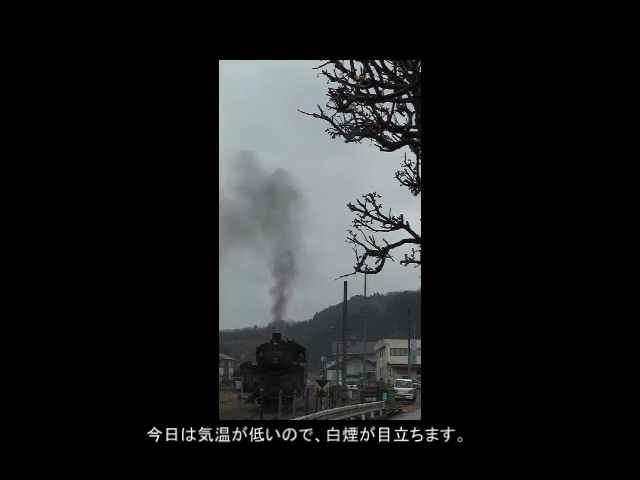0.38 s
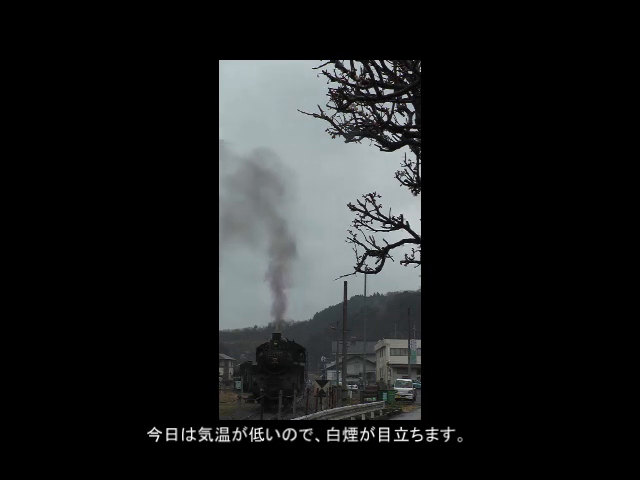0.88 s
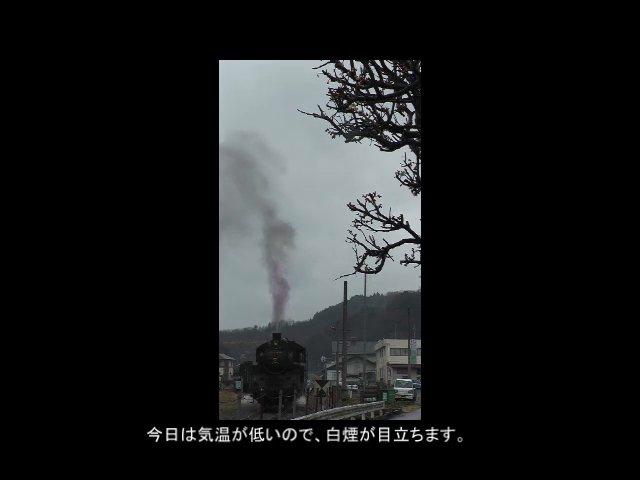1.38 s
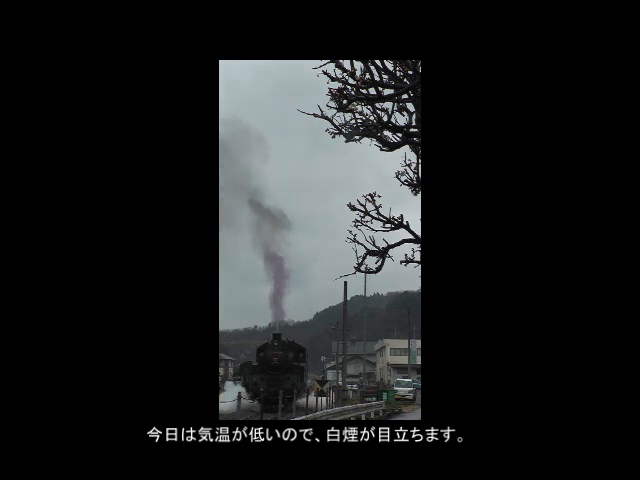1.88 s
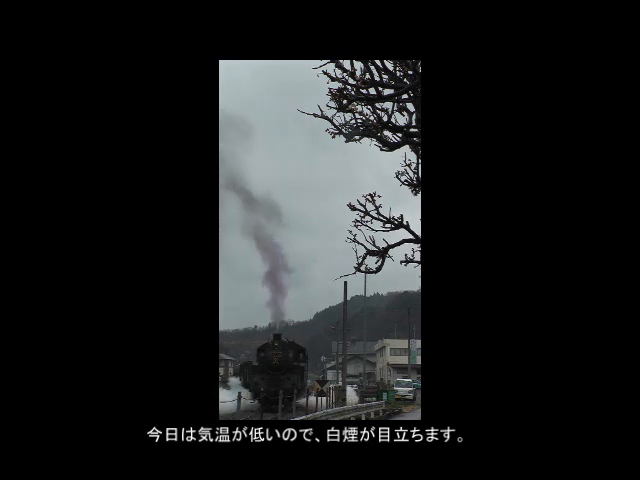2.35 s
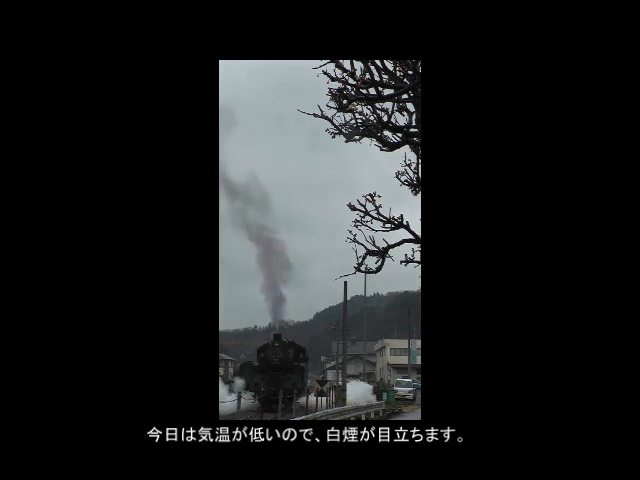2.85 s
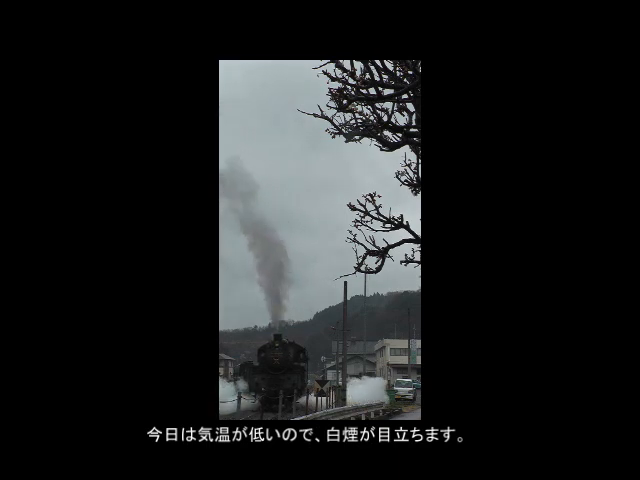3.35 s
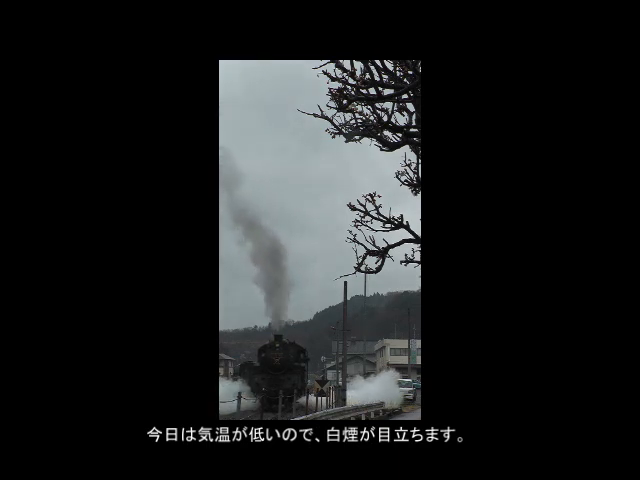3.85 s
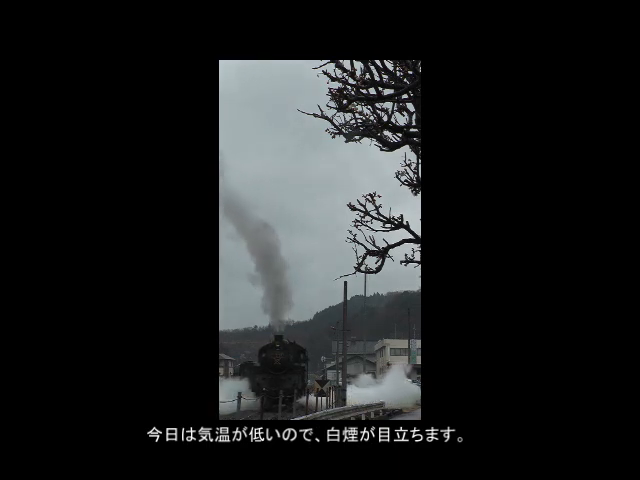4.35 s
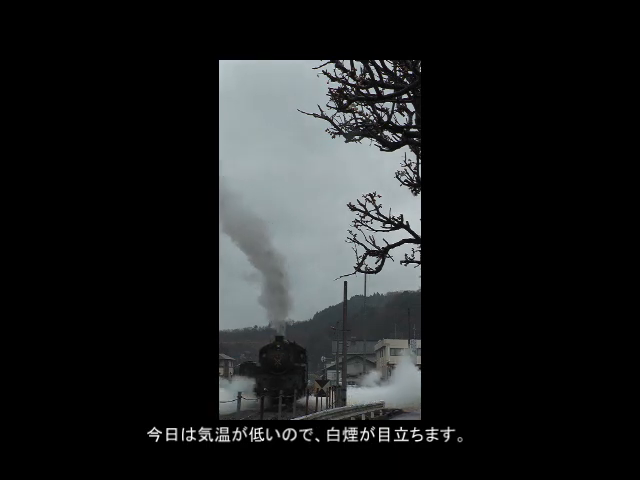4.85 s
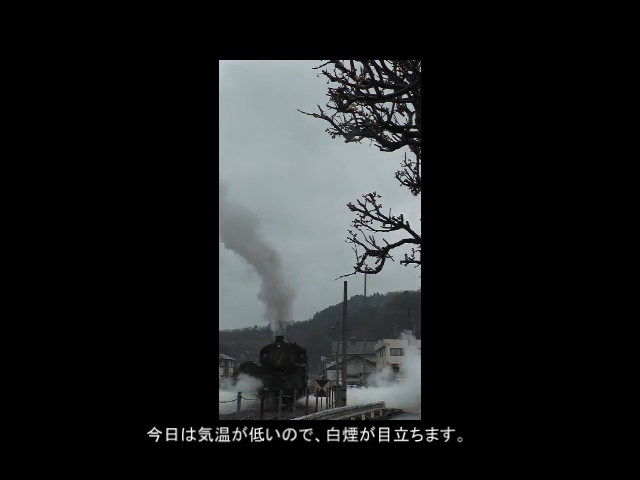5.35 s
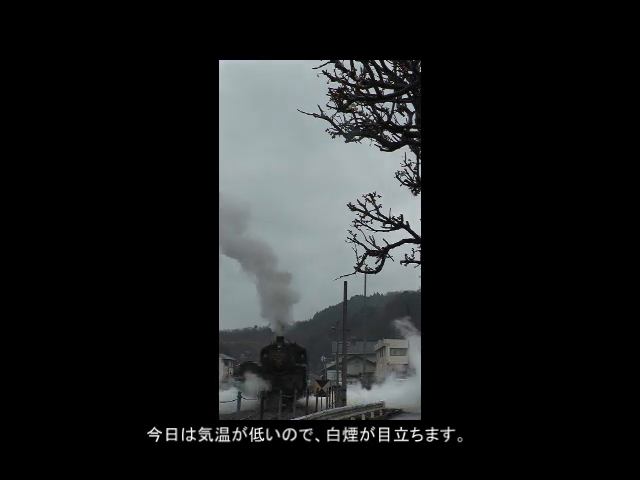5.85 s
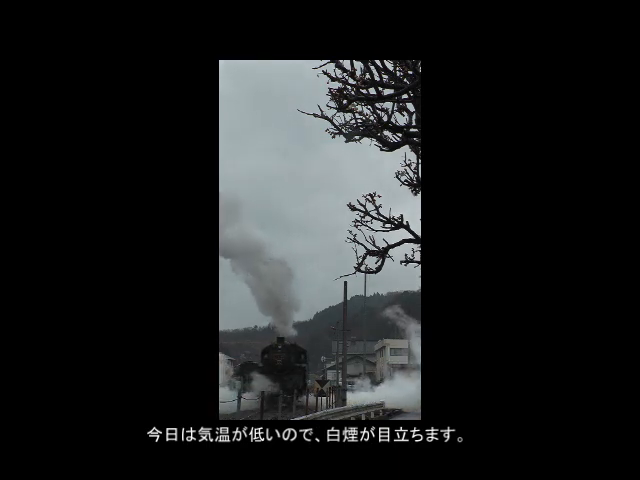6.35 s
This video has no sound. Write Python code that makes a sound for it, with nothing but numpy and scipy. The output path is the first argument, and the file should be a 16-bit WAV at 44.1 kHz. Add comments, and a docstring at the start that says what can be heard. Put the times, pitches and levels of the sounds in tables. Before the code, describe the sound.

A handheld stereo microphone under an umbrella catches crisp irregular drops, dense rain and faint traffic rumble. Then a locomotive's drain cocks open with a muffled low knock and a sudden jet of steam, which holds as a smooth, bright, slightly fluttering hiss, growing slightly and covering the rain. A distant motor rises in pitch, drops and rises again. Finally two bursts of low wind flutter push the hiss down.

```python
"""Drops tap on an umbrella close by over the wash of rain in a street, with low puffs of wind.
Then a steam engine some way off opens its drain cocks: a soft knock and a long bright hissing jet.
A road motor drones past, until a gust buffets the microphone ports and the hiss sinks under it.
Rain, steam and wind are shaped noise; drops and knock are dying rings; motor and gust are wavering swings."""
import sys
import numpy as np
from scipy import signal
from scipy.fft import rfft, irfft, next_fast_len
from scipy.io import wavfile

SR = 44100
rng = np.random.default_rng(int(sys.argv[2]) if len(sys.argv) > 2 else 0)


def to_linear_factor(level_db):
    """Convert decibel levels (scalar or array-like) to linear amplitude factors."""
    exponent = np.asarray(level_db, float) / 20
    return 10 ** exponent


def generate_wav(signal):
    """Clip the signal to [-1, 1] and save it as 16-bit WAV at the path in sys.argv[1]."""
    frames = np.transpose(np.atleast_2d(signal))
    scaled = np.clip(frames, -1, 1) * 32767
    pcm = np.round(scaled).astype(np.int16)
    wavfile.write(sys.argv[1], SR, pcm)


N = 285459
CUTOFF_HZ = 9950   # little is heard above this

# In spectra, level_db is per hertz and only the shape counts. Likeness: 1 = both sides the same, 0 = unrelated.
# big drops on the umbrella: start_s, strength_db, pitch_hz, left_over_right_db
UMBRELLA_DROPS = [(0.1313, -31, 2153, -17), (0.1424, -26, 2780, -7), (0.2144, -34.5, 1119, -7),
                  (0.2184, -29, 2174, -0.5), (0.244, -36.5, 1162, -14), (0.2477, -30.5, 3220, 0),
                  (0.2866, -35, 1500, -3), (0.3316, -32, 3014, 1), (0.3719, -36, 2980, -1),
                  (0.4219, -34.5, 3122, -6), (0.4393, -33, 1870, -6), (0.4579, -29, 1850, -5),
                  (0.4651, -30, 680, -8), (0.4706, -31.5, 784, 2), (0.4861, -24.5, 2150, -6.5),
                  (0.5284, -38, 624, -7), (0.5563, -40, 1540, 1), (0.6001, -36.5, 1593, 2),
                  (0.6084, -31.5, 1650, -12), (0.6411, -24.5, 1630, -6), (0.7427, -40, 1464, -4),
                  (0.7666, -30.5, 1470, -9), (0.7715, -34.5, 2120, -1), (0.8315, -38, 620, -7),
                  (0.8404, -34, 1500, -4), (0.8737, -33, 910, -7), (0.917, -37, 1571, -3),
                  (0.9494, -44, 586, -4), (0.9737, -36, 2000, -3), (0.9928, -37, 1270, -4),
                  (1.077, -32, 920, -4), (1.174, -38, 1184, -3), (1.222, -28.5, 3030, -3.5),
                  (1.2312, -40.5, 666, -6), (1.339, -26, 2180, -5), (1.3448, -19.5, 1610, -7.5),
                  (1.3545, -35.5, 1540, 1), (1.4317, -29, 2270, -3), (1.4941, -25.5, 980, -6),
                  (1.582, -36, 695, -3), (1.7018, -30, 1098, -6), (1.8233, -31.5, 1290, -9),
                  (1.8566, -33, 760, -10), (1.917, -31.5, 684, -4), (2.0095, -31.5, 1120, -6),
                  (2.5234, -43.5, 689, -13), (2.6766, -35, 1230, -12.5), (3.2313, -38.5, 1300, -15),
                  (4.0064, -37, 606, -10), (4.732, -38, 1122, -6), (4.8, -31, 1291, -16),
                  (5.402, -36.5, 1130, -7), (5.565, -40.5, 585, -14)]
# rain on the street and far traffic: time_s, wash_level_db, rumble_level_db
STREET_LEVELS = [(0.0, -54.5, -66.5), (0.75, -54, -58.5), (1.1, -56.5, -67), (1.35, -56, -59),
                 (1.6, -47.5, -54.5), (2.1, -51.5, -60), (2.4, -56, -64.5), (2.9, -76.5, -63),
                 (3.7, -53.5, -57.5), (4.3, -57.5, -60), (5.05, -49, -53.5), (5.4, -59, -57),
                 (6.1, -50.5, -52.5), (6.47, -44, -66)]
# colour of the rain wash: frequency_hz, level_db
WASH_SPECTRUM = [(240, -44), (400, -5), (544, -2.5), (769, -6), (1210, -3), (1910, -2.5), (2630, -5.5),
                 (3430, -7), (9720, -17), (12600, -44.5), (21400, -120)]
# colour of the traffic rumble: frequency_hz, level_db
RUMBLE_SPECTRUM = [(90, -17), (150, -1.5), (220, 2), (270, -3), (350, 3), (460, -9.5), (700, -14.5)]
# how alike the two sides of the street are: frequency_hz, likeness
STREET_LIKENESS = [(60, .1), (250, .6), (520, .7), (1070, .65), (2200, .8), (4500, .93), (9300, .9)]
# breeze on the ports between puffs: time_s, level_db
BREEZE_LEVELS = [(0.0, -56.5), (0.8, -61), (1.25, -63.5), (1.55, -59.5), (2.2, -65.5), (2.6, -73),
                 (3.1, -62), (3.4, -63.5), (3.8, -66), (4.4, -61.5), (5.2, -61.5), (6.1, -55.5), (6.2, -29),
                 (6.47, -32.5)]
# colour of the wind: frequency_hz, level_db
WIND_SPECTRUM = [(15, -37), (35, -3), (60, 5.5), (100, 1), (160, -16.5), (300, -28.5), (600, -42.5)]
# puffs of wind: peak_s, peak_level_db, left_over_right_db, dying_time_s
WIND_PUFFS = [(0.01, -44, -2, 0.036), (0.13, -48, -2, .04), (0.25, -50, 6, 0.021), (0.49, -58, 4, 0.046),
              (0.63, -49, 4, 0.079), (3.13, -50, -7, 0.024), (3.21, -52, -2, 0.044), (3.46, -47, -5, 0.033),
              (5.21, -52.5, 3, 0.094), (5.59, -44, 6, .12), (5.72, -46.5, 12, 0.13)]
# steam jet before it sinks: time_s, jet_level_db, roar_over_hiss_db
JET_LEVELS = [(1.44, -57, -18.5), (1.475, -49, -16), (1.49, -34.5, -29), (1.53, -29.5, -16),
              (1.75, -29.5, -14.5), (2.1, -28, -12.5), (2.22, -27, -22), (2.27, -29, -16),
              (2.78, -27.5, -19), (3.25, -27.5, -16.5), (4.2, -26.5, -15.5), (5.2, -26, -14.5),
              (5.9, -25.5, -13.5), (6.12, -27.5, -12), (6.47, -29, -10)]
# colour of the hiss: frequency_hz, level_db
HISS_SPECTRUM = [(1500, -30.5), (2600, -16.5), (3400, -11), (4200, -6.5), (5000, -3), (5900, -1.5),
                 (6800, -4.5), (7800, -8.5), (9300, -9), (9900, 13), (10500, -66.5)]
# colour of the spreading cloud's roar: frequency_hz, level_db
ROAR_SPECTRUM = [(300, -29.5), (700, -24), (1200, -15.5), (1800, -7.5), (2400, -3), (2650, -3.5),
                 (3200, -6), (4500, -12.5)]
# how alike the two sides of the jet are: frequency_hz, likeness
JET_LIKENESS = [(500, .68), (1100, .76), (2000, .9), (2900, .92), (4300, .985), (6300, .975), (9300, .94)]
# the jet again off the wet ground: frequency_hz, strength (share of the direct sound)
ECHO_STRENGTH = [(1000, .12), (2000, .3), (2800, .42), (3500, .33), (4200, .2), (6000, .1), (9000, .08)]
# low modes of the drain cocks: pitch_hz, level_db (before the soft start), time_to_fall_60_db_s
COCK_MODES = [(311, -33, 0.16), (150, -40, 0.16), (182, -45, 0.27)]
# a wavering hum: time_s, pitch_hz, level_db
HUM_PATH = [(3.35, 214, -72), (3.5, 217, -64), (3.7, 219, -66), (3.8, 221, -72), (3.95, 223, -65),
            (4.4, 225, -65), (4.7, 224, -67.5), (5.0, 224, -72)]
# road motor, its pitch climbing, dropping back and climbing again: time_s, pitch_hz, level_db
MOTOR_PATH = [(3.8, 60.4, -63), (4.19, 62.26, -59), (4.31, 61.6, -77), (4.48, 65.8, -55),
              (4.8, 72.17, -58.5), (5.41, 75, -57.5), (5.63, 64.1, -58), (5.8, 68.4, -65), (6.1, 71.6, -55)]
# two bouts of the gust: start_s, end_s
GUST_BOUTS = [(6.152, 6.3), (6.395, 6.5)]
# hardest eddies of the gust: middle_s, port (0 left, 1 right), strength_db, swing_hz
GUST_EDDIES = [(6.16, 0, -13, 115), (6.19, 0, -18, 135), (6.213, 0, -13, 112), (6.272, 0, -17, 110),
               (6.292, 0, -13, 88), (6.34, 0, -24, 80), (6.4, 0, -17, 140), (6.415, 0, -15, 170),
               (6.455, 0, -16, 140), (6.176, 1, -16, 120), (6.205, 1, -19, 105), (6.267, 1, -14, 100),
               (6.287, 1, -13, 95), (6.415, 1, -13, 175), (6.458, 1, -14, 165)]


def rms_one(x):
    """Scale to rms 1."""
    return x / np.sqrt(np.mean(x ** 2) + 1e-20)


def in_time(rows):
    """Columns of a table, joined by straight lines, at every sample."""
    s, *columns = np.transpose(rows)
    return [np.interp(np.arange(N) / SR, s, c) for c in columns]


def fade(rows, edge_s):
    """1 while the table lasts, fading in just before it and out just after."""
    t = np.arange(N) / SR
    return np.clip(np.minimum(t - rows[0][0], rows[-1][0] - t) / edge_s + 1, 0, 1)


def at_hz(points, hz):
    """A spectrum read on a log-frequency axis."""
    point_hz, value = np.transpose(points)
    return np.interp(np.log(hz), np.log(point_hz + 1), value)


def panned(x, pan_db):
    """Stereo: half the level difference goes to each side."""
    return x * to_linear_factor([pan_db / 2, -pan_db / 2]).reshape(2, -1)


def drift(rate):
    """Slow chance: noise at every 40th sample, smoothed twice by a low-pass at rate (Hz); spread 1."""
    r = np.exp(-80 * np.pi * rate / SR)
    noise = rng.standard_normal(N // 40 + 2002)
    slow = signal.lfilter([1], [1, -2 * r, r * r], noise)[2000:]   # the settling start is left out
    return np.interp(np.arange(N) / 40, np.arange(len(slow)), rms_one(slow - slow.mean()))


def coloured_noise(spectrum, likeness, shared_db, own_db, rate):
    """Stereo noise in overlapping octave-wide bands that flicker together and each alone; rms 1."""
    size = next_fast_len(N)
    hz = np.arange(size // 2 + 1) * SR / size + 1
    mid, side = rfft(rng.standard_normal((2, size))) * to_linear_factor(at_hz(spectrum, hz))
    alike = np.clip(at_hz(likeness, hz), -1, 1)
    pair = np.sqrt(1 + alike) * mid + np.sqrt(1 - alike) * side * [[1], [-1]]
    place = 2 * np.log2(hz)   # in half octaves
    together = drift(rate)
    first = int(2 * np.log2(spectrum[0][0]))
    last = int(2 * np.log2(min(spectrum[-1][0], CUTOFF_HZ))) + 1
    out = 0
    for k in range(first, last + 1):
        window = np.cos(np.pi / 2 * np.clip(place - k, -1, 1)) ** 2
        flicker = to_linear_factor(shared_db * together + own_db * drift(rate))
        out = out + irfft(pair * window, size)[:, :N] * flicker
    return rms_one(out)


def wind():
    """Lumpy low noise, nearly separate on each port: a swaying breeze, and puffs that rise fast and die."""
    rise_s = .025   # puffs rise the last 10 dB in this time, and fall 10 dB in their dying time
    t = np.arange(N) / SR
    breeze_db, = in_time(BREEZE_LEVELS)
    sway_db = 3.5 + 5 * drift(6)
    power = panned(to_linear_factor(breeze_db + 1.2 * drift(9)), sway_db) ** 2
    for s, peak_db, pan_db, dying_s in WIND_PUFFS:
        below_db = 10 * np.maximum((s - t) / rise_s, (t - s) / dying_s)
        power = power + panned(to_linear_factor(peak_db - below_db), pan_db) ** 2
    noise = coloured_noise(WIND_SPECTRUM, [(20, .1), (600, .1)], shared_db=1.1, own_db=1.1, rate=9)
    return np.sqrt(power) * noise


def street():
    """Rain too far and dense to hear as drops, over the rumble of traffic: two coloured noises."""
    wash_db, rumble_db = in_time(STREET_LEVELS)
    wash = coloured_noise(WASH_SPECTRUM, STREET_LIKENESS, shared_db=.4, own_db=.6, rate=12)
    rumble = coloured_noise(RUMBLE_SPECTRUM, STREET_LIKENESS, shared_db=0.3, own_db=1.1, rate=6.0)
    return to_linear_factor(wash_db) * panned(wash, pan_db=-3.0) + to_linear_factor(rumble_db) * panned(rumble, pan_db=0.5)


def ring(clicks, hz, t60):
    """A unit click sets a sine of about height 1 ringing, falling 60 dB in t60 seconds."""
    r, w = to_linear_factor(-60 / (t60 * SR)), 2 * np.pi * hz / SR
    return signal.lfilter([0, np.sin(w)], [1, -2 * r * np.cos(w), r * r], clicks + 1e-18)


def patter():
    """Small drops land at random in loose clumps, each ringing a few cycles at one of 14 pitches."""
    drops_per_s, level_db, pan_db = 160, -53.5, 2   # rate before clumping, level of the smallest drops
    sizes = to_linear_factor(4.7 * np.minimum(rng.exponential(1, N), 3.5)) * rng.choice([-1, 1], N)
    born = rng.random(N) < drops_per_s * to_linear_factor(3.1 * drift(8)) / SR
    pitches, dealt = np.geomspace(450, 6000, 14), rng.integers(0, 14, N)
    taps = sum(ring(sizes * born * (dealt == k), hz, 4.7 / hz) for k, hz in enumerate(pitches))
    return panned(to_linear_factor(level_db) * taps, pan_db)


def drops():
    """A drop is a tick, a few cycles of the taut cloth and a short splatter, a little different in each ear."""
    cloth_cycles = 6.0   # the cloth falls 60 dB in this many cycles
    overtone, overtone_db = 2.3, -5   # pitch ratio and level over the main ring
    out, t = np.zeros((2, N + 2000)), np.arange(1500) / SR
    dull = signal.butter(2, 4500, fs=SR, output="sos")
    chance = signal.sosfilt(dull, rng.standard_normal((len(UMBRELLA_DROPS), 3, 1500)))
    for (s, strength_db, hz, pan_db), noise in zip(UMBRELLA_DROPS, chance):
        swing = np.sin(2 * np.pi * hz * t)
        swing = swing + to_linear_factor(overtone_db) * np.sin(2 * np.pi * overtone * hz * t)
        onset = np.minimum(2 * t * hz, 1)   # half a cycle
        cloth = swing * onset * to_linear_factor(-60 * (t * hz - .5) / cloth_cycles)
        tick = 0.5 * noise[0] * to_linear_factor(-60 * t / 0.003)
        splatter = 0.28 * (noise[0] + .5 * noise[1:]) * to_linear_factor(-60 * t / 0.041)
        at = round(s * SR)
        out[:, at:at + 1500] += panned(to_linear_factor(strength_db) * (cloth + tick + splatter), pan_db)
    no_bass = signal.butter(2, 220, "high", fs=SR, output="sos")   # the cloth is too small for bass
    return signal.sosfilt(no_bass, out[:, :N])


def ground_echo(x):
    """Direct sound plus a duller copy just behind it, wavering as the cloud drifts: a comb of peaks and notches."""
    lag_s, phase_turns = .00263, .33
    size = next_fast_len(N + 2000)
    hz = np.arange(size // 2 + 1) * SR / size + 1
    echo = at_hz(ECHO_STRENGTH, hz) * np.exp(-2j * np.pi * (hz * lag_s - phase_turns))
    return x + irfft(rfft(x, size) * echo, size)[:, :N] * to_linear_factor(1.2 * drift(1.5))


def scattered(x):
    """Faint late copies, by detours through swirling air, come, go and turn over: fine peaks drift in the hiss."""
    lags_s, copy_db = [.0044, .0079, .0131, .0178, .0221], -18
    late = (np.roll(x, round(lag * SR), axis=1) * drift(4.4) for lag in lags_s)
    return x + to_linear_factor(copy_db) * sum(late)


def sinking():
    """dB by which the hiss has sunk: a steady slide through each bout of the gust, a quick climb after it."""
    sink_db_per_s, recover_db_per_s, lead_s = 108, 420, .008
    t = np.arange(N) / SR
    sunk_db = 0
    for start, end in GUST_BOUTS:
        slide = sink_db_per_s * (t - start + lead_s)
        climb = sink_db_per_s * (end - start + lead_s) - recover_db_per_s * (t - end)
        sunk_db = sunk_db + np.maximum(np.minimum(slide, climb), 0)
    return sunk_db


def steam():
    """A smooth bright hiss from the nozzles over a lower roar of the spreading jet, both fluttering."""
    roar_sinks = .45   # the roar sinks by this share of the hiss's dB
    jet_db, roar_db = in_time(JET_LEVELS)
    sunk_db = sinking()
    hiss = coloured_noise(HISS_SPECTRUM, JET_LIKENESS, shared_db=0.58, own_db=1.03, rate=31)
    roar = coloured_noise(ROAR_SPECTRUM, JET_LIKENESS, shared_db=0.9, own_db=2.0, rate=16.4)
    direct = np.vstack([panned(hiss, pan_db=-1.3), to_linear_factor(roar_db) * panned(roar, pan_db=-2.2)])
    jet = scattered(ground_echo(direct))
    hiss, roar = jet[:2], jet[2:]
    together = np.std(hiss + roar)
    level = fade(JET_LEVELS, 0.018) * to_linear_factor(jet_db) / together
    return level * (to_linear_factor(-sunk_db) * hiss + to_linear_factor(-roar_sinks * sunk_db) * roar)


def valve():
    """A soft blow, drawn out over a few hundredths of a second, rings the cocks' low modes."""
    start_s = 1.513
    t = np.maximum(np.arange(N) / SR - start_s, 0)
    swell = 1 - np.exp(-t / 0.021)
    return sum(to_linear_factor(level_db - 60 * t / t60) * swell * np.sin(2 * np.pi * hz * t)
               for hz, level_db, t60 in COCK_MODES)


def drone(rows, waver):
    """Motor or hum: a low near-sine whose pitch wavers by a small share."""
    hz, level_db = in_time(rows)
    turns = np.cumsum(hz * (1 + waver * drift(4.3))) / SR
    tone = np.sqrt(2) * np.sin(2 * np.pi * turns)   # rms 1
    return panned(fade(rows, .1) * to_linear_factor(level_db) * tone, pan_db=2.5)


def edge_tone():
    """A faint whistling edge in the jet: noise twice through a narrow resonance, swelling and fading."""
    start_s, end_s, level_db = 4.3, 4.85, -47
    pitch_hz, width_hz = 3950, 160   # width of each resonance
    r, w = np.exp(-np.pi * width_hz / SR), 2 * np.pi * pitch_hz / SR
    resonance = [1, 0, -1.7, 1, -2 * r * np.cos(w), r * r]
    narrow = signal.sosfilt([resonance] * 2, rng.standard_normal(N))
    return to_linear_factor(level_db + 2.0 * drift(3.9)) * fade([[start_s], [end_s]], .25) * rms_one(narrow)


def gust():
    """Each port swings unevenly, faster or slower with the eddy that passes; the crests lean and flatten."""
    half_length = 1.4   # of an eddy, in swings
    bout_db, bout_edge_s = -25, .008   # buffeting under the eddies
    rasp_hz, rasp_db = (180, 650), -23   # rough air on top of the swings, relative to their size
    t, out = np.arange(N) / SR, []
    bouts = sum(fade([[start], [end]], bout_edge_s) for start, end in GUST_BOUTS)
    band = signal.butter(2, rasp_hz, "band", fs=SR, output="sos")
    rasp = to_linear_factor(rasp_db) * rms_one(signal.sosfilt(band, rng.standard_normal((2, N))))
    for port in range(2):
        s, _, strength_db, hz = np.transpose([row for row in GUST_EDDIES if row[1] == port])
        # the eddies all lie in the last second
        swells = np.cos(np.pi / 2 * np.clip((t[-SR:, None] - s) * hz / half_length, -1, 1)) ** 2
        power = (bouts * to_linear_factor(bout_db + 2.0 * drift(27))) ** 2
        power[-SR:] += swells ** 2 @ to_linear_factor(2 * strength_db)
        turns = np.cumsum(np.interp(t, s, hz)) / SR + rng.random()
        phase = 2 * np.pi * turns + 0.7 * drift(45)
        swing = np.sin(phase) + .12 * np.cos(2 * phase + drift(20))
        swing = swing + 0.064 * np.sin(3 * phase) + 0.027 * np.sin(5 * phase)
        out.append(np.sqrt(power) * (swing + rasp[port]))
    out = np.array(out)
    return .9 * (out - .12 * out[::-1])   # an eddy that pushes one port pulls at the other


def whistle():
    """One short, faint, soft-edged note as the hiss comes back: a sine with a wandering phase."""
    start_s, end_s, pitch_hz, peak_db = 6.34, 6.38, 1400, -49
    t = np.arange(N) / SR
    note = np.sin(2 * np.pi * pitch_hz * t + 1.0 * drift(30))
    return to_linear_factor(peak_db) * fade([[start_s], [end_s]], 0.013) * note


def scene():
    """All sources, in the open."""
    rain = street() + drops() + patter()
    road = drone(MOTOR_PATH, waver=.006) + drone(HUM_PATH, waver=0.0041)
    engine = steam() + valve() + whistle() + edge_tone()
    return engine + rain + road + wind() + gust()


def top_cut(x):
    """Nothing passes above the cut-off."""
    return signal.sosfilt(signal.butter(12, 9870, fs=SR, output="sos"), x)


def record(dry):
    """Peaks are rounded off below a ceiling and the top of the treble is cut steeply."""
    ceiling = .33
    rounded = ceiling * np.tanh(dry / ceiling)
    low_pass = signal.cheby2(16, 70, CUTOFF_HZ + 450, fs=SR, output="sos")
    finished = signal.sosfilt(low_pass, rounded)
    return top_cut(finished)


dry = scene()
out = record(dry)
generate_wav(out)
```